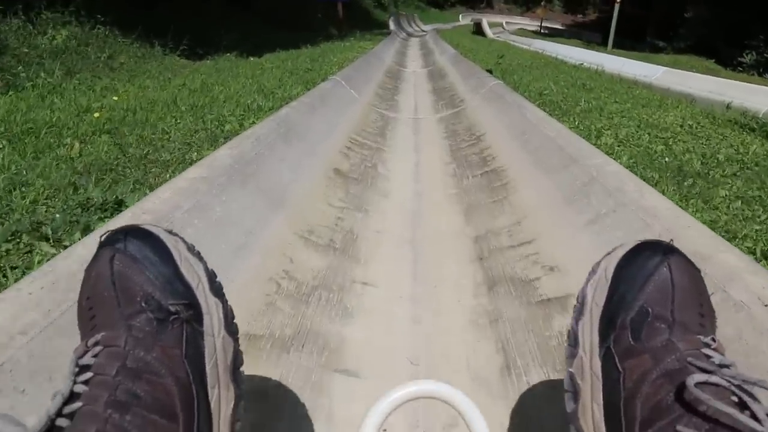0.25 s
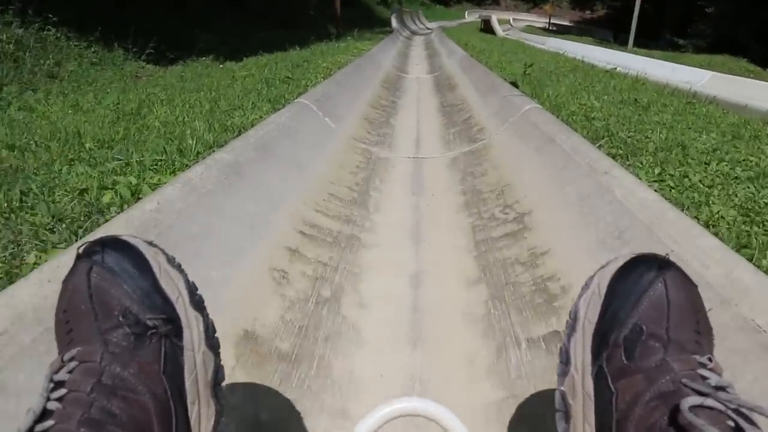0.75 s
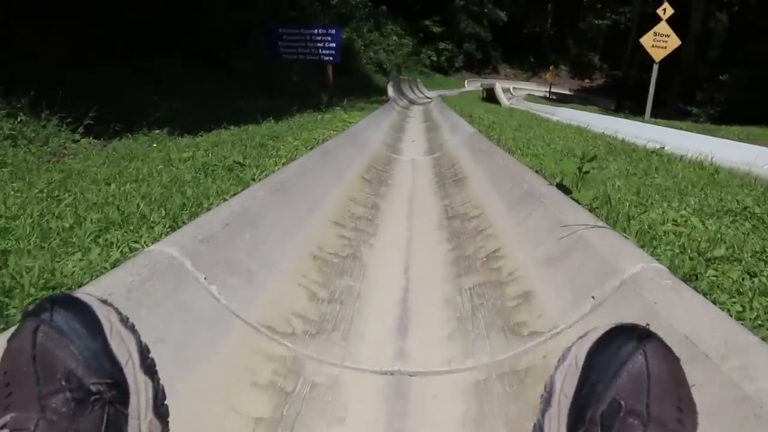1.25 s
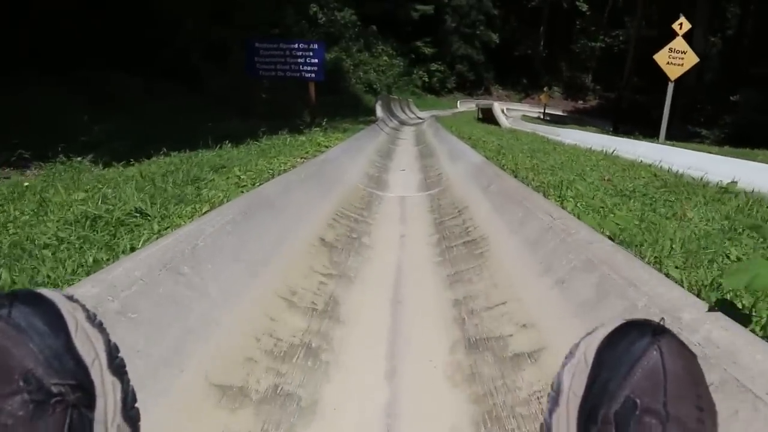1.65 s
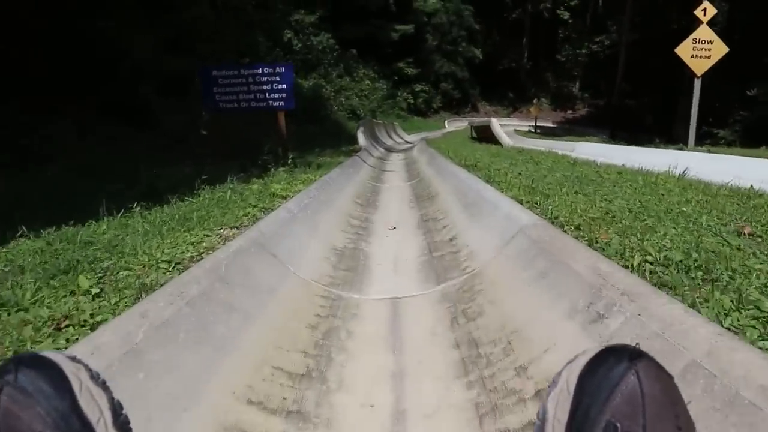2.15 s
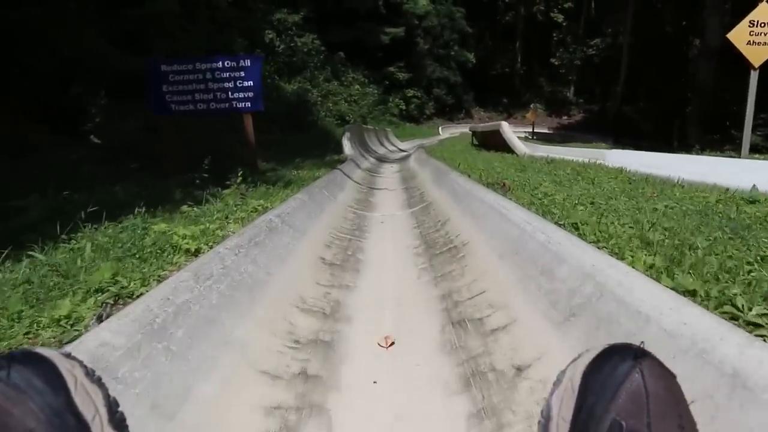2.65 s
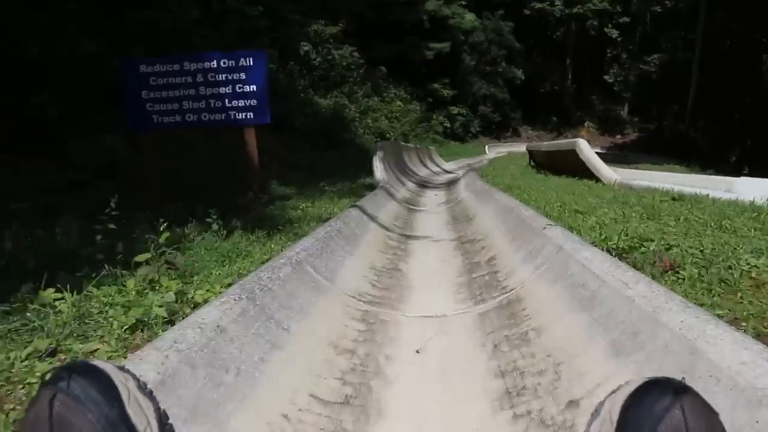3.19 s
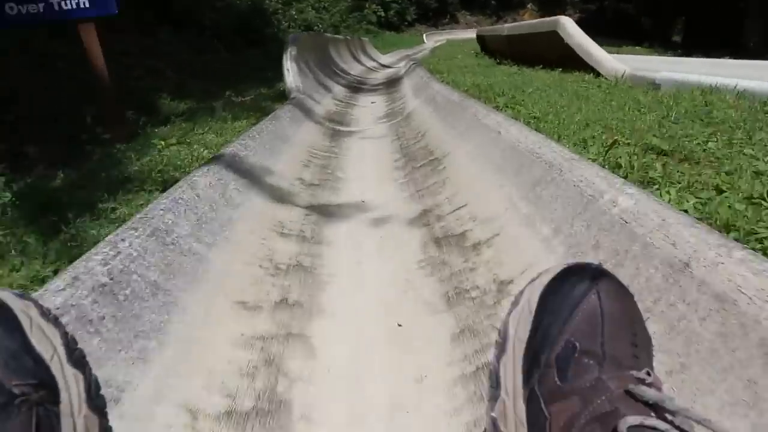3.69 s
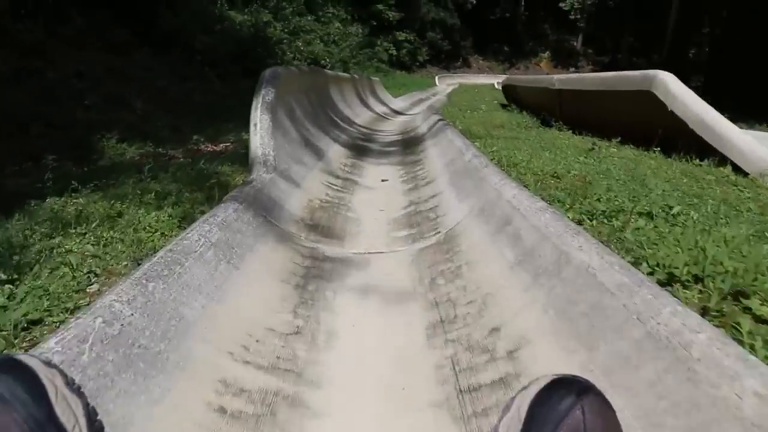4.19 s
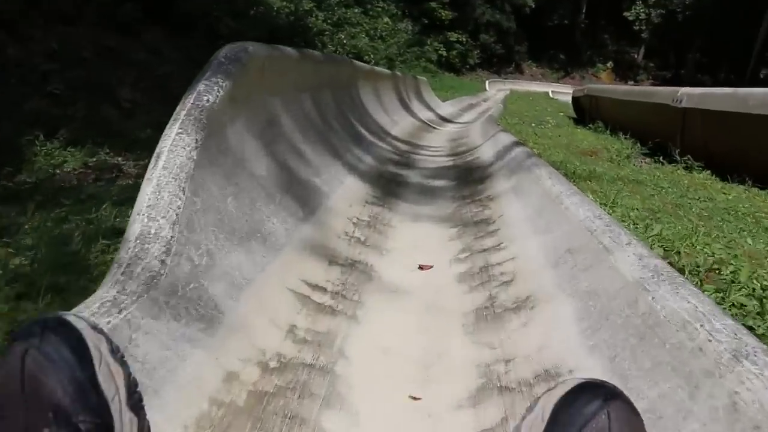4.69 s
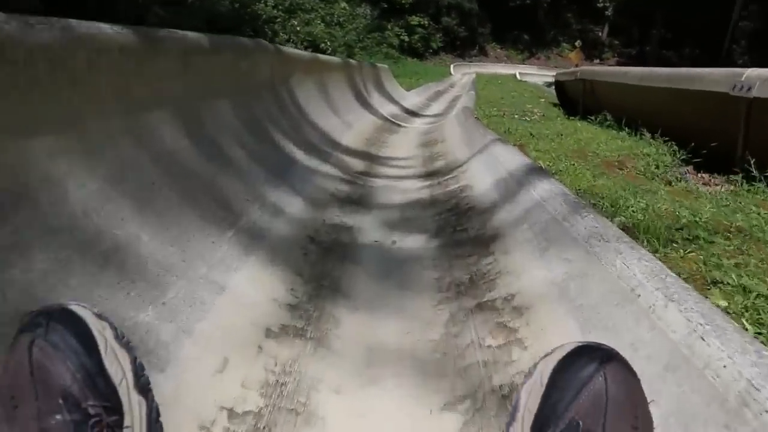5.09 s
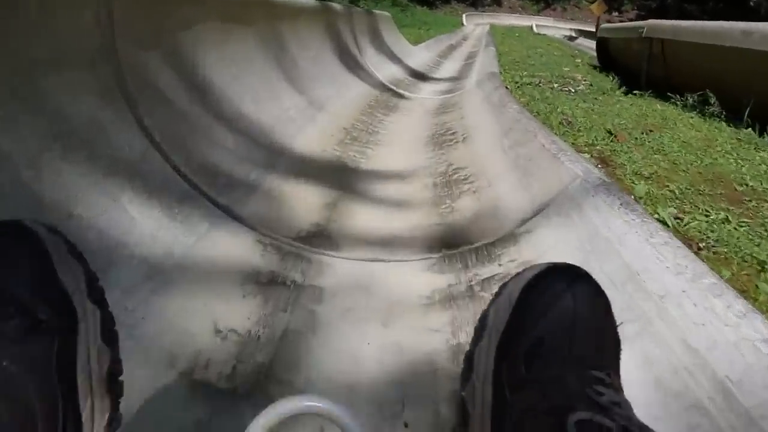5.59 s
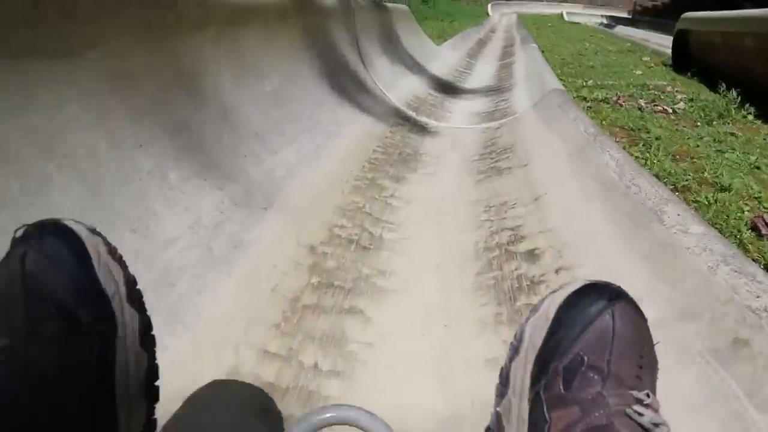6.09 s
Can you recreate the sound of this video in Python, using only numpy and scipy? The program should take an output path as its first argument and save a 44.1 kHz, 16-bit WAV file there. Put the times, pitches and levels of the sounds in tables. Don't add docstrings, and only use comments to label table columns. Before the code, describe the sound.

A sled's hollow hull rumbles and rattles down a trough, recorded close on board in open air. Low, broadband rolling fills the stereo image, with thin, wide treble. Strong thumps distort at intervals, each with knocks and bouncing parts after it. Faint grit ticks and low gusts mix in. The second half thins out, leaving quieter rolling, one last hard joint and light rattles.

```python
import sys
import numpy as np
from scipy import signal
from scipy.fft import rfft, irfft, next_fast_len
from scipy.io import wavfile

SR = 44100
rng = np.random.default_rng(int(sys.argv[2]) if len(sys.argv) > 2 else 0)


def nominal_scale(level):
    x = np.asarray(level, float) / 20
    return 10 ** x


def digitize_waveform(pressure):
    field = np.atleast_2d(pressure).T
    bounded = np.clip(field, -1, 1)
    quanta = np.round(bounded * 32767).astype(np.int16)
    wavfile.write(sys.argv[1], SR, quanta)


N = 279884

# (frequency [Hz], density [dB per Hz])
ROLL_SPECTRUM = [(15, -39), (25, -8.5), (98, -3.5), (150, -1.5), (278, -3), (318, -2), (415, -7),
                 (543, 0.5), (811, -7), (1120, -18), (1310, -20.5), (1860, -24.5), (6720, -44), (9770, -68),
                 (15000, -85.5)]
# (frequency [Hz], side minus mid [dB])
STEREO_WIDTH = [(30, -20), (70, -16), (150, -18), (320, -27), (600, -11.5), (1100, -9), (2200, 2.5),
                (4000, 8), (7000, 9), (9500, 21.5), (14000, 1.5)]
LAYER_EDGES_HZ = (100, 420, 1600)
# (frequencies [Hz], layer numbers: 0 wind, 1 rumble, 2 hull, 3 hiss)
LAYER_BLEND = ([70, 130, 330, 500, 1100, 2400], [0, 1, 1, 2, 2, 3])
# (time [s], speed as rolling level [dB], load on the hull [dB])
RIDE = [(0.0, 4.5, -2), (0.3, 2.5, -2), (0.7, -3, 2), (1.1, 1.5, -2.5), (1.5, 3.5, 0), (1.849, -0.5, 5),
        (2.2, -3.5, 2), (2.6, -1, 0.5), (2.998, -3, 1.5), (3.4, -6, -2), (3.8, -6, 5), (4.199, -12, 3),
        (4.6, -15.5, 3.5), (4.88, -17.5, 5), (5.3, -16, 1), (5.8, -14, -1.5), (6.35, -12.5, 1.5)]
# (time [s], gain drop [dB], flight [s], silence in flight [dB])
GAIN_DROPS_AND_LEAPS = [(-0.05, 19, 0.02, 7.5), (0.468, 6.5, 0.13, -6), (1.898, 11.5, 0.084, 22),
                        (2.826, 15, 0.094, -7), (3.838, 8, 0.13, 14), (4.922, 9, 0.23, 9)]
# (middle [s], length [s], level [dB])
WORN_PATCHES = [(0.19, .08, 5.5), (0.32, 0.15, 5), (0.44, 0.064, 9), (0.68, 0.068, -0.5), (1.03, 0.03, 3),
                (1.25, 0.18, 3), (1.56, 0.044, 1.5), (1.73, 0.025, 5), (2.43, 0.11, 3.5), (2.69, 0.053, 3),
                (3.25, 0.084, 2.5), (3.49, 0.057, 6), (3.66, .05, 1), (3.92, 0.065, 3.5),
                (4.06, 0.088, -6.5), (4.52, 0.13, 3), (4.62, 0.054, -5), (4.76, 0.25, 5), (5.56, 0.062, 3),
                (5.72, 0.037, 5), (5.77, 0.028, 7), (5.88, .09, 4), (6.3, 0.089, -3), (6.17, 0.14, 1.5)]
# (middle [s], length [s], level [dB])
RUMBLE_SWELLS = [(0.2, 0.32, 0), (0.52, 0.048, 0.5), (1.04, 0.078, -0.5), (1.35, 0.25, -2.5), (1.5, 0.063, 0.5),
                 (1.93, 0.058, 13), (3.0, 0.065, 2.5), (3.5, .1, 2.5), (4.4, 0.035, -1), (5.17, 0.053, 5.5),
                 (5.43, 0.16, 4), (5.85, 0.43, -3), (6.15, 0.16, 4.5)]
# (middle [s], length [s], level [dB])
GUSTS = [(0.05, 0.051, 1.5), (0.26, 0.05, -2), (0.4, .1, 0.5), (0.62, 0.08, -5), (1.5, 0.48, 1.5),
         (2.45, 0.041, 3), (2.7, 0.12, 2.5), (3.0, .07, 5), (3.6, 0.042, -7), (4.55, 0.16, -0.5),
         (5.12, 0.053, 0.5), (5.35, 0.092, 1), (6.0, 0.035, -2)]
# (time [s], level [dB])
SEAT_JOLTS = [(0.477, -24), (0.78, -16.5), (1.9, -21.5), (2.1, -22), (2.81, -34.5), (3.15, -32),
              (3.84, -47.5), (4.18, -37), (4.91, -49), (5.29, -39)]

# (wind [dB], rumble [dB], hull [dB], hiss [dB])
LAYER_DB = [-37.5, -22.5, -24.5, -45]
# (wind [dB/dB], rumble [dB/dB], hull [dB/dB], hiss [dB/dB])
FOLLOW_SPEED = [0.81, 0.99, 0.9, 1.05]
FOLLOW_GAIN = [.4, 0.801, .9, 1.052]
FOLLOW_AIR = [.5, 0.33, 0.62, 0.31]
FOLLOW_LOAD = [0.84, 0.41, 1, -0.22]
FOLLOW_PATCH = [.1, 0.13, 1.58, 0.21]
FOLLOW_GUST = [3, 0.05, 0.017, .05]
FOLLOW_RUMBLE_SWELL = [.2, 1.04, 0.085, 0.041]
# (wind [dB], rumble [dB], hull [dB], hiss [dB])
SHARED_FLICKER_DB = [.5, .7, .7, .35]
OWN_FLICKER_DB = [1.1, .9, 1.8, 1.2]

# (time [s], peak [dB], pitch [Hz], swell time [s])
JOINTS = [(0.461, 1, 231, 0.0027), (1.8931, 2, 180.7, 0.0036), (2.817, -1.5, 181.5, 0.0039),
          (3.8335, 0, 182.7, 0.0032), (4.908, -2.5, 170.4, 0.004), (6.15, -16.5, 202.4, 0.0077)]
# (time [s], peak [dB], pitch [Hz], swell time [s])
BOUNCES = [(0.765, -15, 271, 0.0058), (0.78, -11.5, 218, 0.004), (0.801, -18, 189, 0.004),
           (1.112, -29, 213, 0.0029), (1.241, -16.5, 236, 0.0039), (1.557, -19, 167, 0.0053),
           (1.728, -5.5, 199, 0.004), (2.083, -13.5, 149.4, 0.0068), (2.959, -9, 286, 0.0024),
           (2.98, -11.5, 260, 0.0016), (3.13, -10.5, 153, 0.0017), (3.262, -18.5, 158, 0.0031),
           (3.978, -14, 180, 0.0036), (3.992, -8.5, 293, 0.0029), (4.157, -17.5, 127, 0.0025),
           (5.267, -28, 197, 0.0054), (5.287, -28.5, 108, 0.0033)]
# (time [s], peak [dB], pitch [Hz], swell time [s])
FRAME_KNOCKS = [(0.464, -8, 335, 0.0056), (4.082, -20.5, 415, 0.0037), (4.91, -0.5, 356, 0.0039),
                (5.089, -22, 294, 0.0019)]
# (frequency [Hz], level [dB], t60 [s])
HULL_MODES = [(580, -1.5, 0.036), (847, -5.5, 0.036), (1304, 1, 0.023), (1474, 3, 0.013)]
# (time [s], peak [dB], pitch [Hz], treble crack [dB], left minus right [dB])
SLAPS = [(0.637, -15.5, 632, -55, 4), (0.645, -3, 746, -36.5, 4.5), (0.656, -13, 458, -44, -2),
         (0.706, -17, 743, -42, -5), (0.714, -31.5, 915, -47, -1), (1.455, -13, 644, -44, 4),
         (1.72, -11, 804, -45, 3), (1.861, -18, 586, -37.5, 8), (2.007, -10, 435, -40, 1.5),
         (2.815, -10, 642, -33.5, -4.5), (2.961, -21, 460, -49.5, -6.5), (3.833, -9.5, 643, -35.5, -5),
         (3.993, -17.5, 610, -34, 6.5), (4.082, -17.5, 750, -43, 7), (4.908, -6, 665, -36, 4.5),
         (5.09, -25.5, 703, -48, 1), (5.184, -35, 890, -54, -5), (5.603, -28, 520, -53.5, 3),
         (6.153, -17.5, 707, -45.5, 5), (6.239, -23, 487, -47, 0)]
# (time [s], peak [dB], pitch [Hz])
CHATTER = [(0.558, -22, 676), (0.725, -17.5, 635), (1.015, -20, 700), (1.068, -11.5, 753),
           (1.298, -15, 550), (1.537, -11.5, 840), (1.563, -7.5, 795), (1.617, -12.5, 610),
           (1.658, -13, 578), (2.085, -21, 670), (2.16, -19.5, 845), (2.35, -20, 540), (2.62, -17, 887),
           (2.691, -17.5, 810), (2.944, -26, 690), (3.244, -29, 650), (3.457, -21, 680),
           (3.494, -25.5, 860), (3.509, -24, 774), (3.729, -21.5, 880), (3.919, -37, 880),
           (5.549, -27, 567), (5.704, -32, 760), (5.769, -23.5, 538), (6.122, -22, 667)]
# (time [s], peak [dB], pitch [Hz])
GRIT_TICKS = [(1.864, -41.5, 3850), (2.007, -42.5, 2600), (2.609, -53, 5750), (2.817, -39.5, 3750),
              (3.688, -46.5, 4500), (3.993, -45, 5300), (4.044, -62, 5600), (5.089, -42, 1800),
              (5.184, -51, 1950), (6.237, -51.5, 2550)]


def rms(x):
    return np.sqrt(np.mean(x ** 2) + 1e-20)


def at_hz(points, hz):
    curve_hz, curve_db = np.transpose(points)
    return np.interp(np.log(hz), np.log(curve_hz), curve_db)


def bandpass(order, edges_hz, x):
    return signal.sosfilt(signal.butter(order, edges_hz, "band", fs=SR, output="sos"), x)


def drift(rate_hz):
    pole = np.exp(-40 * np.pi * rate_hz / SR)
    coarse = rng.standard_normal(N // 20 + 2002)
    slow = signal.lfilter([1], [1, -2 * pole, pole * pole], coarse)[2000:]
    return np.interp(np.arange(N) / 20, np.arange(len(slow)), slow / rms(slow))


def add(out, time_s, sound):
    start = round(time_s * SR)
    out[:, start:start + sound.shape[1]] += sound[:, :N - start]


def rolling(levels_db, tilt_db, grit_per_s, grit_db, jolt_share, lean):
    struck = rng.random(N) < grit_per_s / SR
    jolts = struck * nominal_scale(grit_db * np.minimum(rng.exponential(1, N), 2.2))
    ringing = signal.lfilter([1], [1, -0.996], jolts)
    shake = signal.lfilter([0.02], [1, -0.98], ringing)
    white = rng.standard_normal((2, 2, N))
    lumps = 0.9 * drift(12) + 1.4 * drift(22)
    edges = 25 * 2 ** np.arange(0, 9.4, 0.4)
    centres = np.sqrt(edges[1:] * edges[:-1])
    power = nominal_scale(2 * at_hz(ROLL_SPECTRUM, centres)) * np.diff(edges) * 2 / SR
    layer_db = 10 * np.log10(np.bincount(np.searchsorted(LAYER_EDGES_HZ, centres), power))
    out = np.zeros((2, N))
    for k, hz in enumerate(centres):
        place = np.interp(np.log(hz), np.log(LAYER_BLEND[0]), LAYER_BLEND[1])
        weights = np.clip(1 - abs(place - np.arange(4)), 0, 1)
        shaking = 1 + abs(weights @ jolt_share) * shake
        band = bandpass(2, edges[k:k + 2], white[k % 2] * shaking / rms(shaking))
        flicker_db = weights @ SHARED_FLICKER_DB * lumps + weights @ OWN_FLICKER_DB * drift(15)
        flicker_db += weights[2] * tilt_db * np.log2(hz / 700)
        mid_side_db = at_hz(ROLL_SPECTRUM, hz) + [[0], [at_hz(STEREO_WIDTH, hz)]]
        band *= nominal_scale(weights @ levels_db - weights @ layer_db + flicker_db) * nominal_scale(mid_side_db)
        band[1] += lean * weights[2] * band[0]
        out += band
    mid, side = out
    return np.array([mid + side, mid - side])


def swells(rows):
    t = np.arange(N) / SR
    return sum(db * np.exp(-(2 * (t - middle) / length) ** 2) for middle, length, db in rows)


def layer_levels():
    fall_s, recover_s, land_s, jolt_s = 0.03, 0.68, 0.0074, 0.017
    t = np.arange(N) / SR
    ride_s, speed_db, load_db = np.transpose(RIDE)
    speed, load = np.interp(t, ride_s, speed_db), np.interp(t, ride_s, load_db)
    gain, air = 0, 0
    for start, drop_db, flight_s, silence_db in GAIN_DROPS_AND_LEAPS:
        fall = np.clip((t - start) / fall_s, 0, 1)
        gain = gain - drop_db * fall * np.exp(-np.maximum(t - start, 0) / recover_s)
        lift = np.clip((t - start) / flight_s, 0, 1)
        landing = np.clip((start + flight_s - t) / land_s + 1, 0, 1)
        air = air - silence_db * lift * landing
    shares = np.transpose([FOLLOW_SPEED, FOLLOW_GAIN, FOLLOW_AIR, FOLLOW_LOAD,
                           FOLLOW_PATCH, FOLLOW_GUST, FOLLOW_RUMBLE_SWELL])
    controls = np.array([speed, gain, air, load, swells(WORN_PATCHES), swells(GUSTS), swells(RUMBLE_SWELLS)])
    levels_db = np.array(LAYER_DB)[:, None] + shares @ controls
    jolts = sum(nominal_scale(db) * np.exp(-((t - s) / jolt_s) ** 2) for s, db in SEAT_JOLTS)
    levels_db[0] = 10 * np.log10(nominal_scale(2 * levels_db[0]) + jolts ** 2)
    tilt_db = 4 + 0.8 * load - 0.022 * speed
    return levels_db, tilt_db


def thumps(table, gain_db, after_s, upper_ratio, cut_hz):
    out, t = np.zeros((2, N)), np.arange(round(0.12 * SR)) / SR
    phases = rng.uniform(0, 2 * np.pi, (len(table), 2))
    for (s, db, hz, swell_s, upper_db, after_db), phase in zip(table, phases):
        blow = (t / swell_s * np.exp(1 - t / swell_s)) ** 1.31
        shudder = nominal_scale(after_db) * (1 - np.exp(-(t / 0.012) ** 2)) * np.exp(-t / after_s)
        sound = blow * np.sin(2 * np.pi * hz * t)
        sound += nominal_scale(upper_db) * blow * np.sin(2 * np.pi * upper_ratio * hz * t + phase[0])
        low_shudder = np.sin(2 * np.pi * 0.85 * hz * t + phase[1])
        high_shudder = np.sin(2 * np.pi * 1.3 * hz * t + phase[0])
        sound += shudder * (low_shudder + high_shudder)
        add(out, s + 0.0005, nominal_scale(db + gain_db) * np.array([sound, sound]))
    return signal.sosfilt(signal.butter(2, cut_hz, "high", fs=SR, output="sos"), out + 1e-18)


def joints_and_bounces():
    rows = [(*row, -15.5, -16) for row in JOINTS]
    for row in BOUNCES:
        loss_db = 10 * np.log2(row[2] / 150)
        rows.append((*row, -13 - loss_db, -8 - loss_db))
    return thumps(rows, gain_db=3.0, after_s=0.022, upper_ratio=1.836, cut_hz=110)


def frame_knocks():
    rows = [(*row, -23.5, -18.5) for row in FRAME_KNOCKS]
    return thumps(rows, gain_db=-3.3, after_s=0.016, upper_ratio=0.99, cut_hz=98)


def rattles(table, hull_db, gain_db, crack_db, crack_s, own_t60, side_db, onset_s):
    out, t = np.zeros((2, N)), np.arange(round(0.06 * SR)) / SR
    fading = (1 - np.exp(-t / 0.0008)) * np.exp(-t / crack_s)
    fading += 0.1 * np.exp(-t / 0.012)
    for s, db, hz, crack, pan_db in table:
        spread_db = rng.normal(0, 0.32, len(HULL_MODES))
        crack_gain = nominal_scale(crack + crack_db)
        noise = crack_gain * fading * rng.standard_normal((2, len(t)))
        note = np.sin(2 * np.pi * hz * t) * nominal_scale(-60 * t / own_t60)
        for (mode_hz, mode_db, t60), extra_db in zip(HULL_MODES, spread_db):
            decay = nominal_scale(mode_db + hull_db + extra_db - 60 * t / t60)
            note += decay * np.sin(2 * np.pi * mode_hz * t)
        note *= nominal_scale(db + gain_db) * (1 - np.exp(-(t / onset_s) ** 2))
        mid = bandpass(3, [1200, 3300], noise[0])
        side = bandpass(2, [1200, 5000], noise[1])
        mid *= 0.24 * crack_gain * rms(fading) / rms(mid)
        mid += nominal_scale(-18.5) * side
        lean_db = np.clip(pan_db, -6, 6) / 2
        panned = note * nominal_scale([[lean_db], [-lean_db]])
        add(out, s, panned + mid + nominal_scale(side_db) * side * np.array([[1], [-1]]))
    return out


def slaps():
    return rattles(SLAPS, hull_db=-6.5, gain_db=2.5, crack_db=16.5, crack_s=0.0038, own_t60=0.031,
                   side_db=-4.5, onset_s=0.0015)


def chatter():
    pans_db = 2.5 - 0.5 * rng.standard_normal(len(CHATTER))
    rows = [(s, db, hz, db - 38.5, pan_db) for (s, db, hz), pan_db in zip(CHATTER, pans_db)]
    return rattles(rows, hull_db=-11.0, gain_db=6.0, crack_db=11.0, crack_s=0.0035, own_t60=0.035,
                   side_db=-0.2, onset_s=0.0033)


def grit_ticks(side_db):
    out, t = np.zeros((2, N)), np.arange(round(0.03 * SR)) / SR
    for s, db, hz in GRIT_TICKS:
        noise = bandpass(2, [hz / 1.25, hz * 1.25], rng.standard_normal(2 * len(t)))
        noise = noise[len(t):]
        fading = nominal_scale(-60 * t * hz / 35) * (1 - np.exp(-t / 0.00058))
        burst = nominal_scale(db) * fading * noise * rms(fading) / rms(fading * noise)
        add(out, s, burst * (1 + nominal_scale(side_db) * np.array([[1], [-1]])))
    return out


def scene():
    levels_db, tilt_db = layer_levels()
    roll = rolling(levels_db, tilt_db, grit_per_s=53, grit_db=-1.5,
                   jolt_share=[0.1, 0.15, 0.47, 0.13], lean=0.1)
    low = joints_and_bounces() + frame_knocks()
    return roll + low + grit_ticks(side_db=7.0) + slaps() + chatter()


def top_cut(x):
    return signal.sosfilt(signal.butter(12, 15710, fs=SR, output="sos"), x)


def record(dry):
    self_noise = nominal_scale(-97.5) * rng.standard_normal((2, N))
    left, right = np.clip(dry, -1, 1) + self_noise
    size = next_fast_len(N)
    spectrum, hz = rfft((left + right) / 2, size), np.fft.rfftfreq(size, 1 / SR)
    mid = irfft(spectrum * (hz < 6300), size)[:N]
    together = drift(5.0)
    shares = np.interp(np.arange(16), [0, 2, 4, 7, 11, 15], [1.6, -0.1, -0.7, 0.4, -0.5, -1.1])
    for low_hz, share in zip(np.arange(6300, 15500, 600), shares):
        patch = np.clip(5 * (share + 0.9 * drift(10.0) + 0.35 * together), 0, 1)
        in_band = (hz >= low_hz) * (hz < low_hz + 600)
        mid += patch * irfft(spectrum * in_band, size)[:N]
    side = signal.sosfilt(signal.butter(3, 11500, fs=SR, output="sos"), (left - right) / 2)
    return top_cut(np.array([mid + side, mid - side]))


dry = scene()
out = record(dry)
digitize_waveform(out)
```